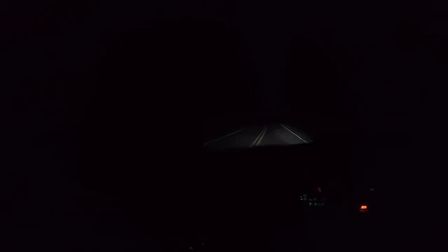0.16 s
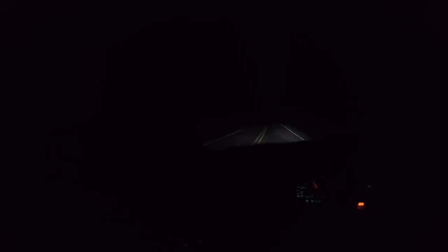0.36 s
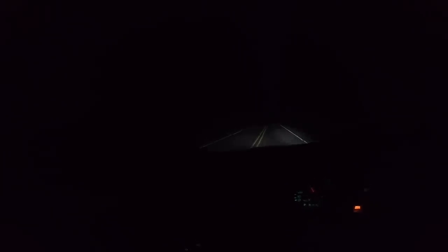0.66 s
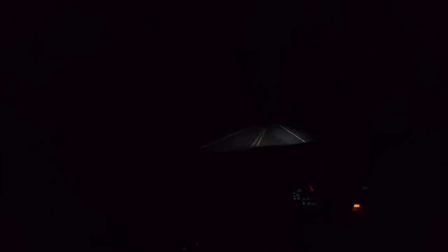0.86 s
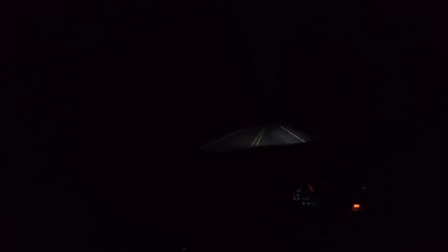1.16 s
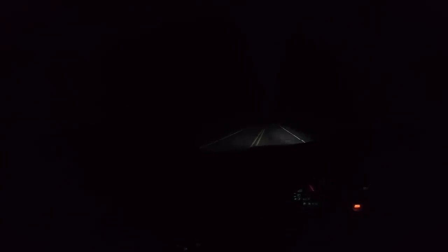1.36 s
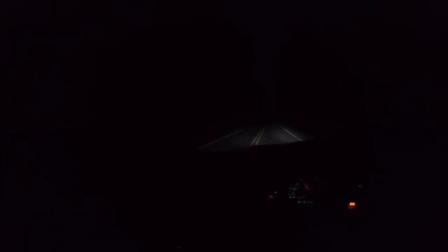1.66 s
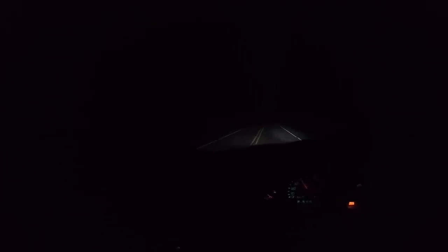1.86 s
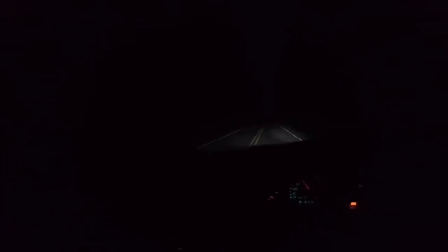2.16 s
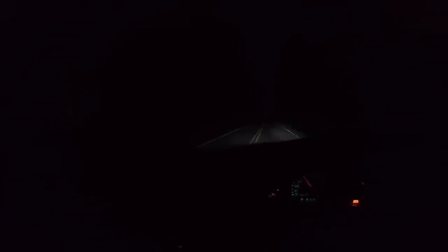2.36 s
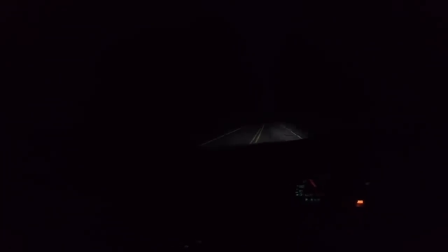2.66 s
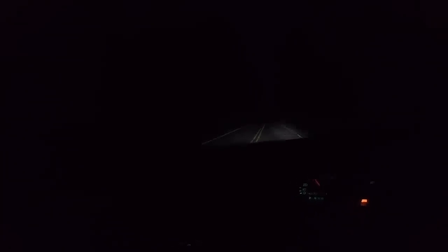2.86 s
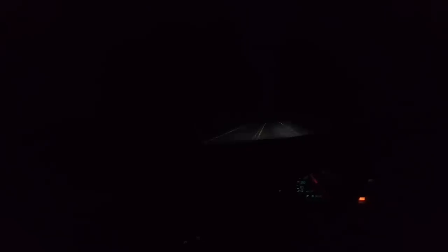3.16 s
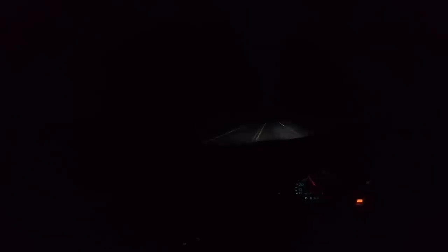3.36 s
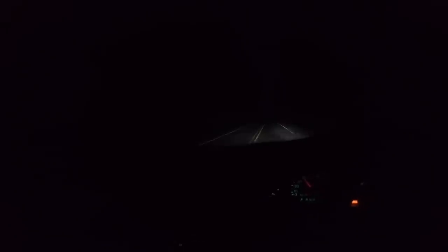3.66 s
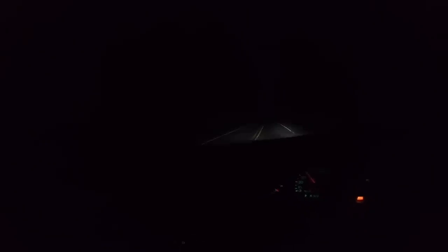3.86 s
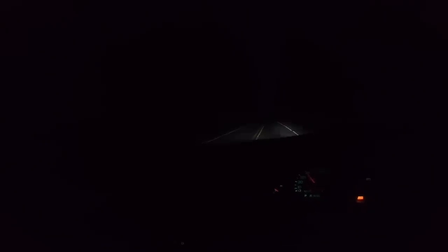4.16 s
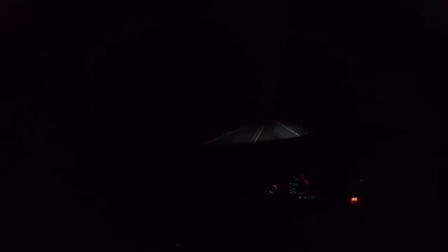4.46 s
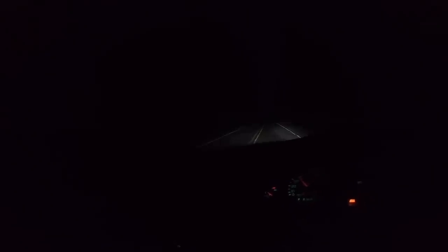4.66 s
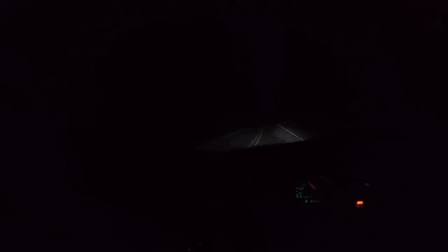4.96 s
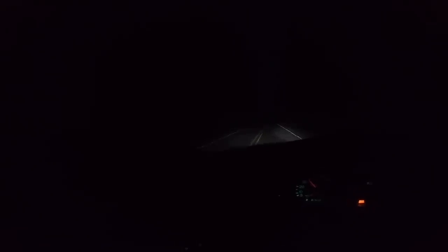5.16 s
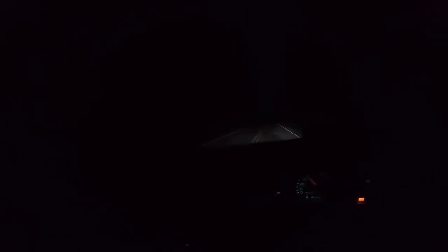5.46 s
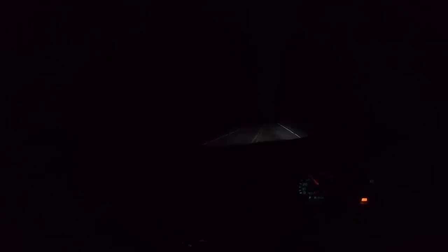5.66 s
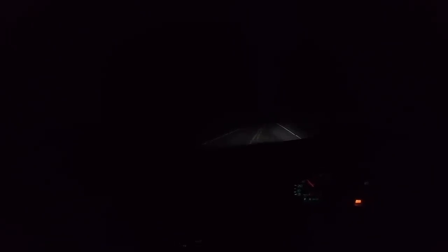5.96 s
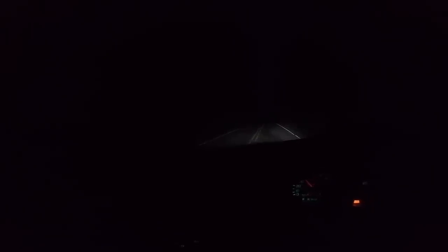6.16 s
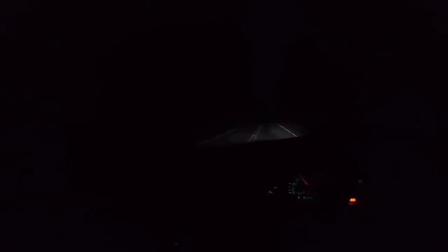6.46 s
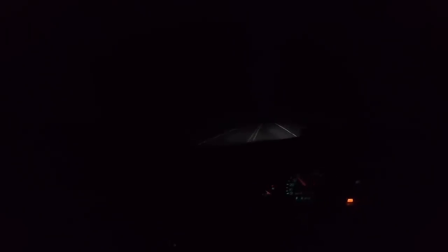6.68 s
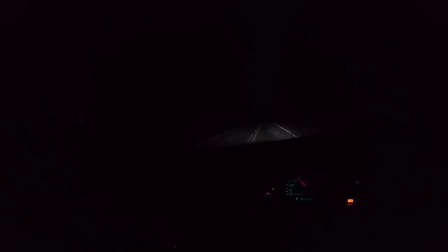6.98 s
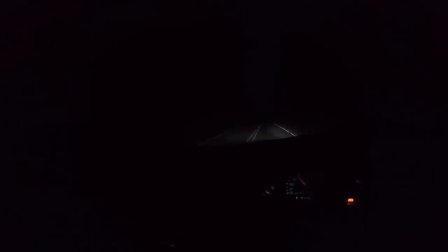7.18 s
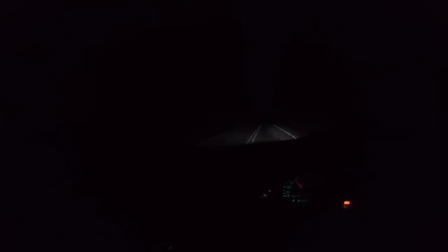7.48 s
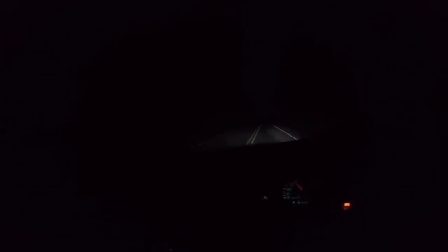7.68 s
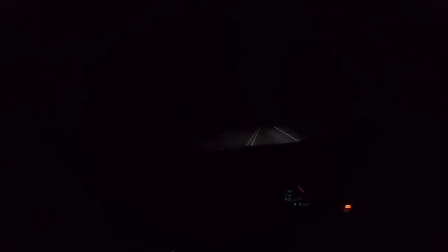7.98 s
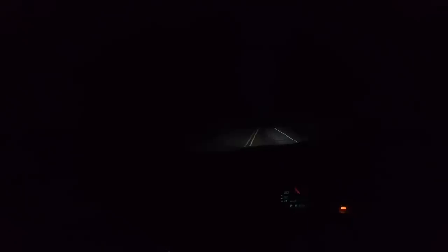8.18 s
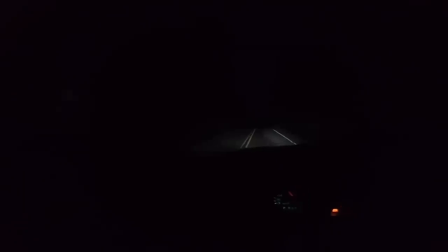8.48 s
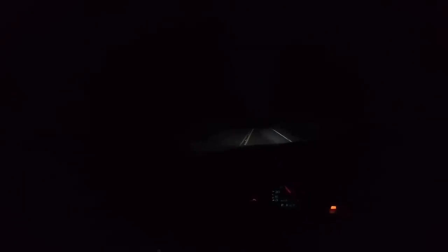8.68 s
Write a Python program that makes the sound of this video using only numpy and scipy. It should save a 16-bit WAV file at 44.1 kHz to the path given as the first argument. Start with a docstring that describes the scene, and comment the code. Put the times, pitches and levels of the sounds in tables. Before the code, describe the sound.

Inside a pickup cab at night, a V8 with straight pipes drones low, eases off, then kicks down and roars steadily higher.

```python
"""The exhaust of a V8 pickup booms inside its cab; it cruises, eases off, then kicks down a gear and pulls
hard. The boom is a sum of sinusoids, the exhaust orders, locked to the crank and coloured by the cab's standing
waves. Noise flaring at each firing makes the churn, the rasp and, in the low gear, the blare of the straight
pipes. Noise paced by the intake strokes hisses, and drifting narrow bands of noise whistle past the throttle
plate. Knocks, pops, clicks and one airy gulp sound as short resonant bursts, over road rumble made of swelling
low-frequency noise."""
import sys
import numpy as np
from scipy import signal
from scipy.fft import rfft, irfft, next_fast_len
from scipy.io import wavfile
from scipy.ndimage import uniform_filter1d, map_coordinates

SR = 44100
rng = np.random.default_rng(int(sys.argv[2]) if len(sys.argv) > 2 else 0)


def materialize(psi):
    """Save the field psi as 16-bit PCM at rate SR to the path in sys.argv[1].

    A 1-D psi becomes a single channel; in a 2-D psi each row is a channel.
    """
    bounded = np.clip(np.atleast_2d(psi).T, -1, 1)
    quanta = np.round(bounded * 32767).astype(np.int16)
    wavfile.write(sys.argv[1], SR, quanta)


N = 389381

# The cylinders in firing order:
# (relative pressure pulse reaching the cab [0-1], feeds the far pipe [0 or 1], relative rasp [dB])
CYLINDERS = [(.85, 0, 5), (.35, 1, 0), (.58, 0, 0), (.5, 1, 4.5), (.5, 1, 0), (.7, 0, 2), (.15, 1, 1),
             (.2, 0, 0)]


def amp(db):
    """Logarithmic level: decibels to amplitude gain."""
    return 10 ** (np.asarray(db) / 20)


def unit(x):
    """Normalisation by energy: scale to rms 1."""
    return x / np.sqrt(np.mean(x ** 2) + 1e-20)


def along(points, hz):
    """Logarithmic frequency scale: (frequency [Hz], value) points interpolated at hz."""
    f, v = np.transpose(points)
    return np.interp(np.log(hz + 1), np.log(f + 1), v)


def curves(rows):
    """Piecewise-linear control: one value per sample for each column after the time."""
    s, *cols = np.transpose(rows)
    return [np.interp(np.arange(N) / SR, s, c) for c in cols]


def wobble(rate):
    """Slow random modulation: a smooth curve through rate random knots a second."""
    coarse = np.arange(0, N + 64, 64)
    knots = rng.standard_normal(int(N * rate / SR) + 4)
    curve = map_coordinates(knots, [coarse * rate / SR], mode="nearest")
    return np.interp(np.arange(N), coarse, curve)


def filtered(x, response):
    """Linear filtering: the spectrum of x times a response of frequency."""
    size = next_fast_len(N + 8192)
    hz = np.fft.rfftfreq(size, 1 / SR)
    return irfft(rfft(x, size) * response(hz), size)[..., :N]


def noise():
    """Independent random sources: two unrelated white noises."""
    return rng.standard_normal((2, N))


def in_cab(pair, spectrum):
    """Interaural coherence: unrelated signals mix as middle and side; the coloured middle has rms 1."""
    # (frequency [Hz], left-right correlation [-1 to 1])
    alike = [(40, .994), (150, .998), (300, .985), (400, .93), (560, .6), (1000, .48), (2000, .4),
             (4000, 0), (8000, -.27), (13000, 0)]

    def colour(hz):
        turn = np.arccos(np.clip(along(alike, hz), -1, 1)) / 2
        return amp(along(spectrum, hz)) * [np.cos(turn), np.sin(turn)]

    mid, side = filtered(pair, colour)
    return np.array([mid + side, mid - side]) / np.std(mid)


def boom(turns, level_db, waver_db, phase_rad):
    """Additive synthesis: exhaust orders, each emphasised as it passes a standing wave of the cab."""
    # exhaust orders in each state: (multiple of the cycle rate, relative level [dB])
    cruise_orders = [(2, -26), (3, -29), (4, -44), (5, -21), (6, -35), (7, -33), (8, -17.5), (9, -35),
                     (10, -30), (11, -29), (12, -35), (13, -22), (14, -28), (15, -35), (16, -20), (17, -30),
                     (18, -24), (19, -36), (20, -35), (21, -26), (22, -42), (23, -33), (24, -27.5),
                     (25, -27), (26, -28), (27, -39), (28, -39), (29, -28.5), (30, -37), (31, -29),
                     (32, -40), (34, -28), (35, -35), (37, -37), (42, -31), (44, -30), (49, -34), (57, -32),
                     (65, -28), (68, -32), (70, -32), (83, -31)]
    coast_orders = [(2, -39), (3, -24), (4, -39), (5, -19.5), (6, -49), (7, -32.5), (8, -22.5), (9, -34),
                    (10, -31.5), (11, -19.7), (12, -33), (13, -24), (14, -31), (16, -23), (17, -32),
                    (18, -30), (19, -31), (20, -33), (21, -27.5), (22, -32), (23, -39), (24, -36),
                    (25, -39), (26, -30), (27, -30), (28, -29.5), (29, -33), (30, -36), (31, -40),
                    (32, -35), (34, -35), (35, -34), (37, -37), (44, -35), (61, -35)]
    pull_orders = [(2, -29), (3, -24.2), (4, -27.7), (5, -32), (6, -24.3), (7, -24), (8, -16.6), (9, -28.5),
                   (10, -35), (11, -24), (12, -21.5), (13, -22.5), (14, -26.5), (15, -18.7), (16, -25),
                   (17, -24), (18, -25.3), (19, -31), (20, -31), (21, -24), (27, -24.3), (28, -32),
                   (29, -31), (30, -24), (31, -29), (36, -28), (38, -29), (39, -27), (40, -29), (41, -21.7),
                   (42, -28), (45, -30), (46, -29), (49, -29), (51, -29), (54, -30), (57, -28), (64, -28)]
    # the cab's standing waves: (frequency [Hz], relative response [dB])
    cab_modes = [(40, -8), (66, 0), (85, 0), (105, -3), (142, 0), (174, 3), (205, -4), (228, -7), (278, -2),
                 (325, -9), (360, -9), (388, -1), (412, -11), (450, -18)]

    slow = np.arange(0, N, 256)  # controls are computed once every 256 samples

    def smooth(control):
        return np.interp(np.arange(N), slow, control)

    speed = revs()[slow]
    coast, pull, surge_db = np.array(state())[:, slow]
    shares = np.clip([1 - coast - pull, coast, pull], 0, 1)
    tables = (cruise_orders, coast_orders, pull_orders)
    sizes = [{round(k): amp(db) for k, db in table} for table in tables]
    tone, power = np.zeros(N), np.zeros(len(slow))
    for k in sorted(set().union(*sizes)):
        mixed = np.array([order.get(k, 0) for order in sizes]) @ shares
        size = mixed * amp(along(cab_modes, k * speed))
        # higher orders waver more, and all of them do during the shift
        unsteady = amp(waver_db * np.sqrt(k) * amp(surge_db) * wobble(12)[slow])
        phase = np.unwrap(burble(k, speed) - ringing(k * speed))
        angle = 2 * np.pi * k * turns + smooth(phase) + phase_rad
        tone += smooth(np.sqrt(2) * size * unsteady) * np.cos(angle)
        power += size ** 2
    return amp(level_db) * tone / smooth(np.sqrt(power))


def burble(k, speed):
    """Phasor sum: unequal pulses, later from the far pipe, bunch order k into one throb a cycle."""
    far_pipe_s = .0006
    pulse, far, _ = np.transpose(CYLINDERS)
    late = np.arange(len(pulse)) / len(pulse) + np.outer(speed, far * far_pipe_s)  # cycles
    return np.angle(np.exp(-2j * np.pi * k * late) @ pulse)


def ringing(hz):
    """Resonance phase: the lag of a tone turns over as it passes the strongest standing waves."""
    # (centre [Hz], half width [Hz], lag scale [rad])
    rings = [(110, 42, .55), (190, 15, 1.1), (254, 61, 1.35)]
    centre, width, lag = np.transpose(rings)
    detune = (hz[:, None] - centre) / width
    return (detune / (1 + detune ** 2)) @ lag


def churn(train, level_db):
    """Amplitude-modulated noise: low exhaust turbulence that flares at each firing."""
    # (frequency [Hz], relative spectral density [dB])
    churn_colour = [(35, -18), (65, 2.5), (110, -0.5), (170, 3), (220, -0.5), (290, 1), (390, -5),
                    (450, -10), (700, -30.5), (2000, -83)]
    return amp(level_db) * in_cab(puffs(train, t60=0.035, steady=0.93), churn_colour)


def rasp(train, level_db):
    """Turbulence and impulse response: noisy gas flow plus the bark repeated by every firing."""
    # (frequency [Hz], relative spectral density [dB])
    rasp_colour = [(300, -22.5), (430, 1.5), (530, -4.5), (600, 0), (720, -2.5), (880, 1), (1120, -3),
                   (1300, -5.5), (1650, -6), (2000, -14.5), (3000, -24.5), (6000, -29.5), (11000, -58.5)]
    gas = puffs(train, t60=0.03, steady=1.6) + 0.4 * bark(train, t60=0.045)
    return amp(level_db) * in_cab(gas, rasp_colour)


def blare(train, level_db, pull):
    """Load-dependent brightness: short flares of noise that join in as the low gear pulls."""
    # (frequency [Hz], relative spectral density [dB])
    blare_colour = [(700, -27.5), (950, 0), (1250, -4), (1700, 0.5), (2100, -9), (2800, -8.5),
                    (5000, -42.5)]
    crackle = puffs(train, t60=0.007, steady=1.4)
    return pull * amp(level_db) * in_cab(crackle, blare_colour)


def blurt():
    """Transient excitation: extra rasp in dB that jumps up and fades, with a dip in mid-shift."""
    # the throttle snaps open, then the low gear bites: (start [s], extra rasp scale [dB])
    blurts = [(4.975, 7), (5.33, 1)]
    attack_s, decay_s, shift_db = .006, 0.082, -3
    extra_db = np.zeros(N)
    for start, db in blurts:
        t = np.maximum(np.arange(N) / SR - start, 0)
        extra_db += db * np.minimum(t / attack_s, 1) * np.exp(-t / decay_s)
    return extra_db + shift_db * np.sin(np.pi * shift())


def firings(turns, scatter_db, uneven):
    """Impulse train: one pulse per valve opening; uneven sets how much the cylinders differ."""
    _, _, rasp_db = np.transpose(CYLINDERS)
    slot = np.floor(turns * len(rasp_db)).astype(int)
    at = np.flatnonzero(np.diff(slot) > 0) + 1
    scatter = scatter_db * rng.standard_normal(len(at))
    train = np.zeros(N)
    train[at] = amp(uneven * rasp_db[slot[at] % len(rasp_db)] + scatter)
    return train


def puffs(train, t60, steady):
    """Turbulent gas: noise that flares and decays at each pulse over a steady flow."""
    t = np.arange(SR // 20) / SR
    flare = signal.fftconvolve(train, amp(-60 * t / t60))[:N]
    return unit(noise() * (steady + unit(flare)))


def bark(train, t60):
    """Convolution: each firing's pressure front rings the same way in the pipes and the body."""
    t = np.arange(SR // 12) / SR
    ring = rng.standard_normal((2, len(t))) * amp(-60 * t / t60)
    return unit(signal.fftconvolve(train[None], ring, axes=1)[:, :N])


def intake(gulps, level_db):
    """Flow noise: broadband hiss lightly modulated by the even gulps of the intake."""
    # (frequency [Hz], relative spectral density [dB])
    intake_colour = [(1000, -29), (1900, -0.5), (2500, 0), (3200, -1.3), (4200, -6), (4900, -7.5),
                     (6000, -16.5), (9000, -31), (12000, -57)]
    return amp(level_db) * in_cab(puffs(gulps, t60=0.011, steady=5.6), intake_colour)


def spray(gulps, level_db):
    """Fine-scale flow noise: a higher hiss with the same pulsation as the intake."""
    # (frequency [Hz], relative spectral density [dB])
    spray_colour = [(2500, -23), (5000, 1), (6500, -0.5), (8000, -0.5), (9300, -2.5), (10200, -6.5),
                    (11300, -23), (14000, -24.5), (15000, -33.5)]
    return amp(level_db) * in_cab(puffs(gulps, t60=0.014, steady=6.7), spray_colour)


def whistle(width_hz):
    """Modulated narrow-band noise: air past the throttle plate swells, climbs in pitch and dies away."""
    # (start [s], length [s], starting pitch [Hz], level [dB])
    whistles = [(2.095, 1.35, 2390, -40.5), (5.45, 2.2, 2550, -44.5)]
    rise_hz_per_s, attack_s, release_s = 250, .3, 0.15

    def band():
        return filtered(noise(), lambda hz: 1 / (1 + (hz / width_hz) ** 2))

    cosine, sine, out = band(), band(), np.zeros((2, N))
    for start, length, hz, db in whistles:
        t = np.arange(N) / SR - start
        swell = np.clip(np.minimum(t / attack_s, (length - t) / release_s), 0, 1)
        angle = 2 * np.pi * (hz + rise_hz_per_s * t / 2) * t
        out += amp(db) * swell * unit(cosine * np.cos(angle) + sine * np.sin(angle))
    return out


def bursts(width):
    """Damped resonance: knocks, pops, clicks and one airy gulp as decaying bursts of band-shaped noise."""
    # (time [s], relative level [dB], resonance [Hz], t60 [s], broadband snap [0-1])
    short_bursts = [(.762, -27, 950, .09, 0), (1.585, -24, 1000, .05, 0), (2.378, -44, 8500, .14, .3),
                    (4.321, -35, 7700, .09, .35), (4.321, -34, 4000, .04, .4), (4.66, -35, 3800, .11, .05),
                    (4.662, -31.5, 2300, .11, .02), (4.979, -23, 1100, .1, .006),
                    (5.026, -31.5, 2600, .35, .16), (5.03, -40, 7000, .25, .5), (6.296, -17.5, 960, .05, 0)]
    out, t = np.zeros((2, N + SR)), np.arange(SR // 4) / SR
    hz = np.fft.rfftfreq(len(t), 1 / SR)
    for s, db, ring_hz, t60, snap in short_bursts:
        resonance = 1 / (1 + ((hz - ring_hz) / (width * ring_hz)) ** 2) ** 2
        shape = (snap * (hz > 1500) + resonance) * (hz < 10800)
        burst = unit(irfft(rfft(rng.standard_normal((2, len(t)))) * shape, len(t)))
        onset = np.minimum(t / .0007, 1)
        first = round(s * SR)
        out[:, first:first + len(t)] += amp(db - 4 - 60 * t / t60) * onset * burst
    return out[:, :N]


def road():
    """Random excitation: low-frequency rumble that swells irregularly with the bumps."""
    # (frequency [Hz], relative spectral density [dB])
    rumble_colour = [(8, -24), (18, -6), (27, 0), (38, -12.5), (50, -13), (80, -28), (200, -65),
                     (500, -100)]
    level_db, bump_db, bumps_per_s = -24, 4, 7.8
    swells = amp(bump_db * wobble(bumps_per_s))
    return amp(level_db) * unit(swells * in_cab(noise(), rumble_colour))


def revs():
    """Fundamental frequency: four-stroke engine cycles a second."""
    # sagging in top gear, flying up in two surges in the kick-down: (time [s], cycle rate [Hz])
    speed_curve = [(0, 14.02), (.6, 13.856), (1.5, 13.617), (2.5, 13.34), (3.5, 13), (4.4, 12.7),
                   (4.92, 12.47), (4.97, 14.1), (5.02, 15.3), (5.1, 16.1), (5.15, 17), (5.22, 17.6),
                   (5.3, 19.9), (5.38, 21.25), (5.46, 21.55), (5.6, 21.55), (5.9, 21.82), (6.8, 22.09),
                   (7.8, 22.23), (8.3, 22.32)]
    return curves(speed_curve)[0]


def crank(start, wander, shudder):
    """Phase integration: cycles turned; combustion shakes the crank, the slipping clutch far more."""
    slipping = np.sin(np.pi * shift())
    return start + np.cumsum(revs()) / SR + wander * wobble(14) + shudder * slipping * wobble(24)


def shift():
    """Gear change as a linear ramp: 0 in top gear, 1 in the low gear."""
    kick_s, shift_s = 4.9, .5  # start and duration
    return np.clip((np.arange(N) / SR - kick_s) / shift_s, 0, 1)


def throttle():
    """Load control: the driver's foot, 0 shut to 1 fully open."""
    # (time [s], throttle opening [0-1])
    foot = [(0, 0.61), (1.5, 0.54), (3.2, 0.4), (3.55, 0.19), (4.93, 0), (5.05, 0.6), (5.32, 0.45),
            (5.7, 0.79), (7.5, 0.93), (8.83, 0.97)]
    return curves(foot)[0]


def state():
    """Load crossfade: coasting and pulling shares (the rest is cruising) and unsteadiness in dB."""
    # (cruising [dB], added by coasting [dB], by pulling [dB], in mid-shift [dB])
    surge_parts = (4.5, 0, -2, 7.5)
    coast_below, coast_span = 0.62, 0.4  # throttle where coasting starts, and how much lower it is full
    gear = shift()
    pull = gear ** 2
    coast = (1 - pull) * np.clip((coast_below - throttle()) / coast_span, 0, 1)
    cruise_db, coast_db, pull_db, shift_db = surge_parts
    surge_db = cruise_db + coast_db * coast + pull_db * pull + shift_db * np.sin(np.pi * gear)
    return coast, pull, surge_db


def effort(pull):
    """Source strength follows load: base levels in dB of boom, rasp, intake and spray."""
    # each: (throttle shut [dB], added by full throttle [dB], added in the low gear [dB])
    boom_parts = (-14, 0.5, 2.5)
    rasp_parts = (-38, 7, 2)
    intake_parts = (-48.5, 14.5, 0.5)
    spray_parts = (-66, 22.5, -1.5)
    opening = throttle()
    layers = (boom_parts, rasp_parts, intake_parts, spray_parts)
    return [shut + opened * opening + geared * pull for shut, opened, geared in layers]


def sides(hz):
    """Interaural differences: the sound leans left, and its lows reach that ear a little sooner."""
    # (frequency [Hz], left minus right [dB])
    lean = [(150, 0), (340, .5), (560, 5.8), (1000, 5), (2000, 3.7), (4000, 1.7), (9000, 1.5)]
    left_leads_s = .00004
    toward = np.array([.5, -.5])[:, None]
    gains = amp(toward * along(lean, hz))
    # above 500 Hz the phase difference stays constant
    lead = np.exp(2j * np.pi * toward * np.minimum(hz, 500) * left_leads_s)
    return gains / gains.mean(axis=0) * lead


def level_control(x, threshold_db, window, strength):
    """Dynamic compression: fast gain control evens out the loudest throbs."""
    power = uniform_filter1d(np.mean(x ** 2, axis=0), max(1, round(window * SR)))  # window in s
    over_db = np.maximum(10 * np.log10(abs(power) + 1e-12) - threshold_db, 0)
    return x * amp(-strength * over_db)


def scene():
    """Superposition: exhaust, intake, trim and road add up at the driver's seat."""
    _, pull, surge_db = state()
    boom_db, rasp_db, intake_db, spray_db = effort(pull)
    turns = crank(start=.052, wander=.0011, shudder=.016)  # all in cycles
    train = firings(turns + .03, scatter_db=2.1, uneven=1)
    gulps = firings(turns, scatter_db=1.0, uneven=0)  # the intake draws evenly
    pipes_db = rasp_db + blurt()
    cab = boom(turns, boom_db + 1, waver_db=0.1239, phase_rad=-.97)
    cab = cab + churn(train, boom_db + surge_db - 20)
    cab = cab + rasp(train, pipes_db + 1.73 - 1.3 * pull)
    cab = cab + blare(train, pipes_db - 5.5, pull)
    cab = cab + intake(gulps, intake_db + 0.5) + whistle(width_hz=430)
    cab = cab + spray(gulps, spray_db + 3.0)
    cab = cab + bursts(width=0.11) + road()
    return filtered(cab, sides)


def record(dry):
    """Compression, soft saturation and band limiting: throbs held, peaks rounded, top cut off."""
    peak_ceiling, top_hz = .9, 15100
    held = level_control(dry, threshold_db=-14.0, window=0.01914, strength=0.55)
    rounded = held / (1 + (held / peak_ceiling) ** 4) ** (1 / 4)
    fade_in = np.minimum(np.arange(N) / (.004 * SR), 1)
    return filtered(rounded * fade_in, lambda hz: hz < top_hz)


dry = scene()
out = record(dry)
materialize(out)
```